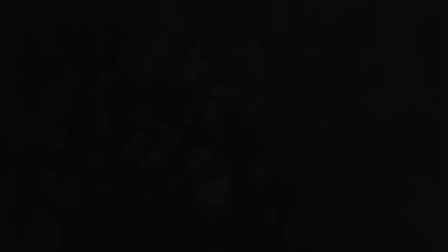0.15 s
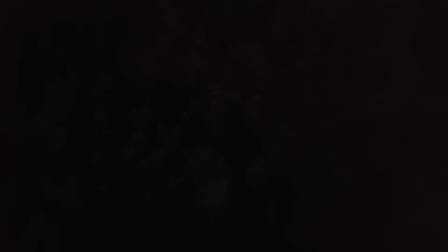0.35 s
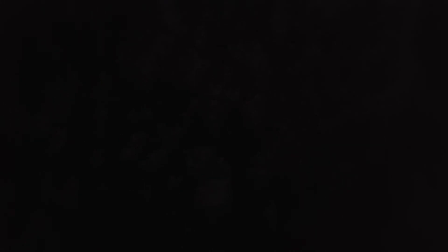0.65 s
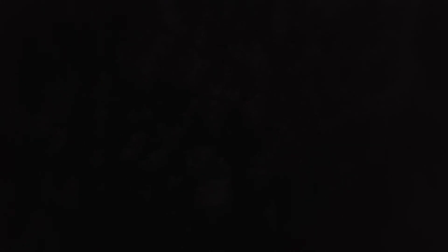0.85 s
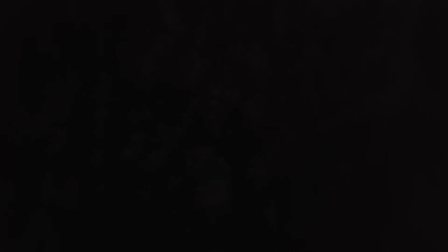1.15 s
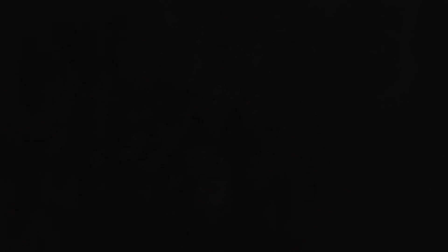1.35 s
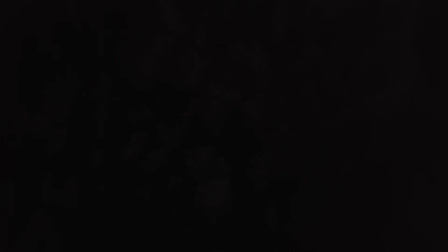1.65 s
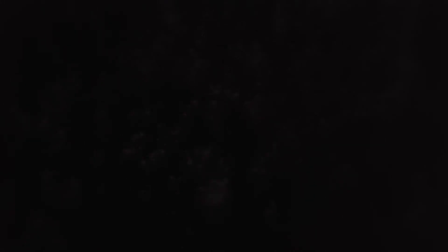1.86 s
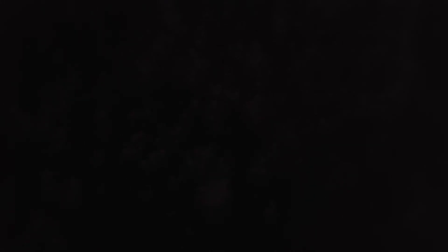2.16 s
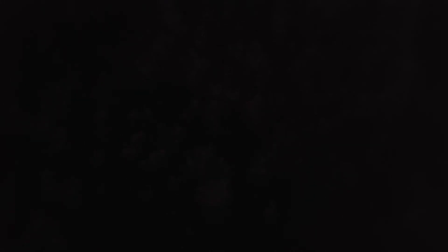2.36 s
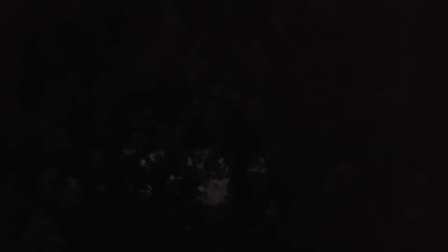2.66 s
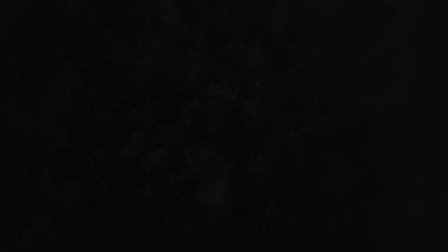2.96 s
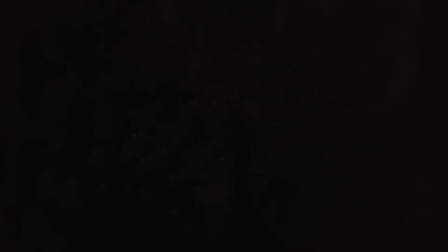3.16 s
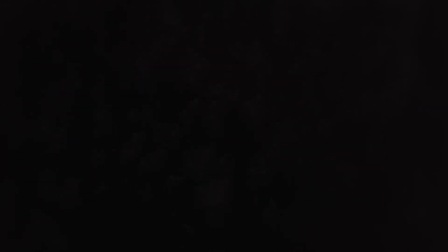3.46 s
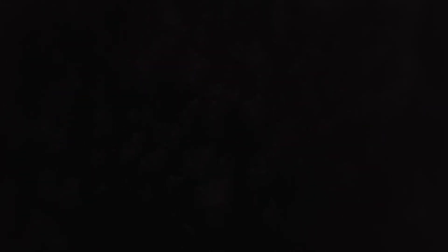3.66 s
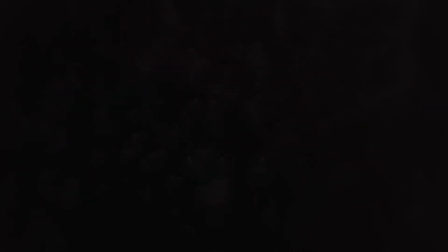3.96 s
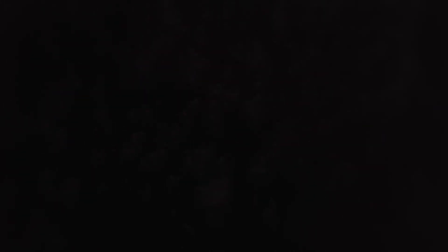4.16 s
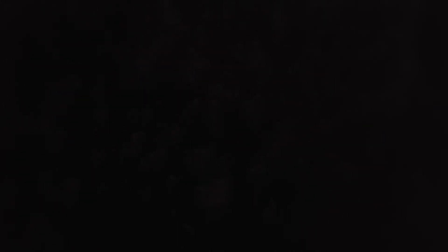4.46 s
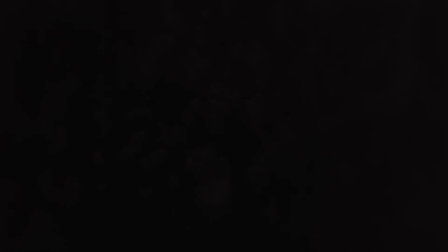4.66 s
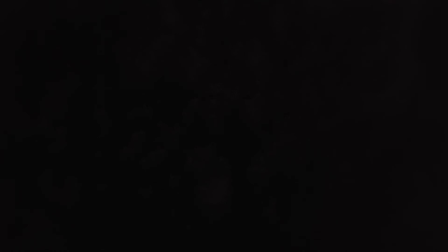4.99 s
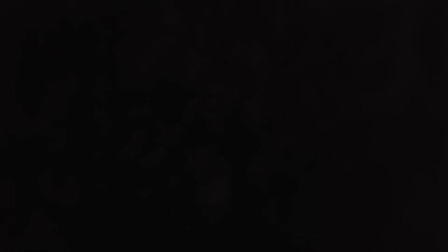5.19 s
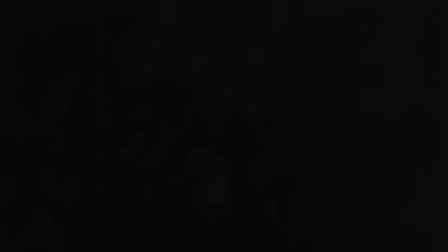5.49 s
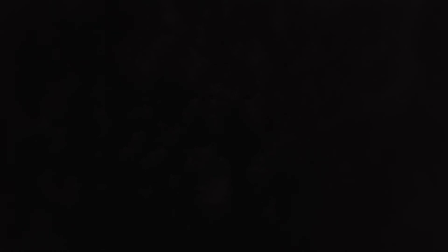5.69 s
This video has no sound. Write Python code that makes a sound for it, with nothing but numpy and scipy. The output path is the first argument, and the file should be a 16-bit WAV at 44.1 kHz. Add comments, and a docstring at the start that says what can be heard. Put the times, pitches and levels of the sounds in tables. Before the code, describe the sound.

Rain falls on a parked car, heard in stereo from inside the small, padded cabin. Throughout, a soft low rumble wavers gently under faint microphone hiss. From 0 to 0.8 seconds, quick irregular taps and dull thuds land on roof and glass, with fine droplets ticking between. Around 0.9 to 1.5 seconds the heaviest cluster arrives: several loud, hollow knocks at about 1.0, 1.08, 1.25 and 1.5. It then eases; from 1.6 to 2.3 drops are more spaced, with a firm hit at 2.5. From 2.7 to 4.8 many softer, muffled taps continue, and the fine patter thins, with bassy roof booms near 3.15 and 4.9. The loudest single knock strikes at 5.3, followed by another solid drop at 5.7 and light taps to the end at about 5.8. Each drop is brief, with a short damped ring of the metal panel and no rhythm.

```python
"""Rain on a parked car, heard from the cabin.

Heavy drops thud on roof and glass over a low rumble (shaped noise) and microphone hiss; finer drops patter between.
Each drop rings the dense panel modes, dying cosine and sine waves, at strengths drawn anew for its spot.
Each heavy drop also throws a droplet that falls back; now and then the roof booms, mostly in its bass modes.
"""
import sys
import numpy as np
from scipy.fft import rfft, irfft, next_fast_len
from scipy.io import wavfile
from scipy.ndimage import map_coordinates

SR = 44100
rng = np.random.default_rng(int(sys.argv[2]) if len(sys.argv) > 2 else 0)


def file_out(sig):
    """Save sig as 16-bit WAV at sys.argv[1]."""
    # one column per channel
    cols = np.atleast_2d(sig).T
    # limit, then scale
    lim = np.clip(cols, -1, 1)
    pcm = np.round(lim * 32767).astype(np.int16)
    wavfile.write(sys.argv[1], SR, pcm)


N = 257103

# Heavy drops. Each row: start in seconds, level in dB, brightness in dB and splat hiss in dB
# (both against the level), remoteness along the panel from 0 to 1.
HEAVY_DROPS = [(0.064,-31,-8,-32,0.057),(0.128,-34.5,-13,-42,0.063),(0.196,-45.5,-8,-36,0.23),(0.237,-32.5,-26,-28,0.35),
               (0.254,-51.5,3,-18,0.4),(0.332,-35.5,-16.5,-25,0.67),(0.367,-32.5,-5.5,-14,0.11),(0.381,-29,-16,-21,0.52),(0.41,-38.5,-14,-20,0.35),
               (0.465,-55,-3,-16,0.29),(0.482,-34.5,-6.5,-19,0.31),(0.514,-37.5,-6.5,-14,0.22),(0.566,-46.5,-9.5,-15,0.44),(0.658,-49.5,-17,2,0.27),
               (0.721,-46.5,-17,-14,0.57),(0.743,-37.5,-37,-21,0.69),(0.894,-25.5,-15,-36,0.23),(0.979,-38.5,-6,-21,0.53),(1.001,-19,-9.5,-19,0.4),
               (1.059,-34,-11,-24,0.56),(1.074,-20,-16,-30,0.53),(1.093,-20.5,-14,-24.5,0.48),(1.175,-32.5,-46,-42,0.086),
               (1.243,-20.5,-19.5,-26,0.35),(1.283,-30,-21.5,-26,0.63),(1.339,-35.5,-13,-40,0.53),(1.36,-43,-3,-36,0.65),
               (1.414,-38,-12,-18,0.56),(1.438,-28,-8,-22,0.057),(1.478,-29.5,-39,-29,0.41),(1.493,-18.5,-14,-18.5,0.52),
               (1.559,-49.5,-2,-3,0.057),(1.747,-34.5,-6.5,-27,0.42),(1.823,-33,-20,-33,0.39),(1.932,-29,-16,-23.5,0.63),
               (2.087,-47,-8,-8,0.78),(2.122,-33.5,-18.5,-23.5,0.53),(2.222,-35,-33,-30,0.49),(2.323,-35.5,-25,-28,0.68),(2.354,-26.5,-2,-20,0.26),
               (2.391,-27.5,-11.5,-34,0.35),(2.456,-32,-20,-26,0.52),(2.521,-21.5,-20,-28.5,0.5),(2.712,-43,-28,-39,0.49),
               (2.754,-33,-28,-21,0.49),(2.766,-37,-6.5,-11,.45),(2.81,-42.5,-9,-11,0.6),(2.829,-30.5,-15,-24,0.51),
               (2.843,-37.5,-5,-23,.39),(2.874,-36,-2,-16,0.61),(2.919,-35,-15,-46,0.38),(3.117,-30,-22,-34,0.87),
               (3.138,-31,-28,-18.5,0.56),(3.184,-31.5,-20,-27,0.54),(3.227,-48,-9,-19,0.61),(3.26,-38.5,-19,-22,0.63),(3.354,-28,-21.5,-31,0.46),
               (3.401,-34,-18,-27,.46),(3.471,-52,-3,-10,0.097),(3.496,-38.5,-21,-19,0.83),(3.529,-32,-17,-28,0.18),
               (3.599,-50.5,-6,-13,0.23),(3.709,-37,-30,-28,0.86),(3.755,-29.5,-19.5,-36,0.53),(3.901,-37.5,-17.5,-24,0.68),(4.045,-35,-14,-28,0.69),
               (4.136,-36,-27,-30,.27),(4.253,-29.5,-12,-49,0.18),(4.289,-33,-21,-25,0.62),(4.337,-30.5,-25,-31,0.64),
               (4.364,-45,-6,-11,0.66),(4.385,-30.5,-16,-20,0.73),(4.414,-30,-12,-16,0.73),(4.457,-31,-20.5,-24,0.53),
               (4.542,-34,-26,-28,0.71),(4.672,-49,-37,-32,0.47),(4.718,-40.5,-14,-20,0.9),(4.742,-32.5,-19,-27,0.65),(4.766,-32,-22,-24.5,0.52),(4.847,-31,-22,-29,0.53),
               (4.863,-41,-17,-18,0.56),(4.882,-27.5,-17.5,-21.5,.46),(4.937,-31.5,-17,-25,0.73),(4.963,-39.5,-15,-31,0.67),(5.059,-32.5,-19.5,-24,0.45),
               (5.186,-35.5,-22,-26,0.31),(5.286,-16,-14,-19,0.42),(5.407,-33.5,-34,-25,0.67),(5.46,-29,-22,-26,0.48),
               (5.594,-45,-11,-45,.68),(5.706,-24,-14,-26.5,0.59),(5.749,-29,-22,-25,0.69),(5.823,-34,-10,-14,0.74)]


def amp(db):
    """Decibels to gain."""
    return 10 ** (np.asarray(db) / 20)


def along(points, hz):
    """Interpolate (Hz, value) points on a log frequency axis, held flat beyond the ends."""
    point_hz, values = np.transpose(points)
    return np.interp(np.log(hz + 1), np.log(point_hz + 1), values)


def filtered(x, response):
    """Filter x by a response given as a function of frequency."""
    size = next_fast_len(N + SR // 2)
    hz = np.fft.rfftfreq(size, 1 / SR)
    return irfft(rfft(x, size) * response(hz), size)[..., :N]


def ears(a, b, hz):
    """Mix two unrelated draws into left and right, as alike as the microphones are at hz."""
    # Each row: frequency in Hz, left-right correlation.
    likeness = [(60, 0.99), (180, 0.96), (550, 0.6), (1650, -0.19), (4970, 0.084), (15000, -0.26)]
    # Each row: frequency in Hz, left minus right in dB.
    lean_db = [(60, -0.5), (180, 1), (550, -1.5), (1650, -3.5), (4970, 1.5), (15000, 1)]
    angle = np.arccos(np.clip(along(likeness, hz), -1, 1)) / 2
    lean = amp(along(lean_db, hz) / 2)
    common, opposed = np.cos(angle) * a, np.sin(angle) * b
    return np.array([(common + opposed) * lean, (common - opposed) / lean])


def noise(spectrum):
    """Stereo Gaussian noise shaped by a spectrum in dB per Hz, scaled to rms 1."""
    size = next_fast_len(N)
    hz = np.fft.rfftfreq(size, 1 / SR)
    a, b = rfft(rng.standard_normal((2, size)))
    x = irfft(ears(a, b, hz) * amp(along(spectrum, hz)), size)[:, :N]
    return x / np.sqrt(np.mean(x ** 2))


def rumble():
    """Distant rain booms softly through the body: low noise whose level drifts and wavers slightly."""
    # Each row: frequency in Hz, relative density in dB per Hz.
    rumble_spectrum = [(12, -54), (20, -8), (80, 4.5), (195, 2), (335, -17), (545, -12.5), (702, -21.5),
                       (1500, -32), (1950, -61), (3300, -120)]
    # Each row: time in seconds, rms level in dB.
    rumble_level = [(0.0, -47), (0.58, -53), (1.51, -47.5), (1.98, -56.5), (3.46, -49), (3.8, -55),
                    (4.86, -49), (5.31, -50.5), (5.83, -47)]
    lump_hz, lump_db = 14, 0.2
    t = np.arange(N) / SR
    s, db = np.transpose(rumble_level)
    lumps = map_coordinates(rng.standard_normal(N * lump_hz // SR + 4), [t * lump_hz])
    return amp(np.interp(t, s, db) + lump_db * lumps) * noise(rumble_spectrum)


def small(s, db):
    """Strike rows for small drops, each with a random colour and distance."""
    z = rng.standard_normal((len(s), 5))
    colour_db = [-6, -4, -10, -26] + [4, 5, 6, 5] * z[:, :4]  # bass, middle, bright, top
    remote = .78 + .2 * z[:, 4]
    return np.c_[s, db, colour_db, remote]


def patter(count, over_db, scatter_db):
    """Fine drops at random moments, their levels scattered about the swelling and thinning shower."""
    # Each row: time in seconds, base level of the fine rain in dB, before over_db.
    shower_level = [(0, -58.5), (1.0, -65.5), (1.2, -55), (1.9, -67.5), (3.8, -73.5), (5.0, -63),
                    (5.83, -70.5)]
    u = rng.random((count, 2))
    s = u[:, 0] * N / SR
    shower_db = np.interp(s, *np.transpose(shower_level))
    return small(s, shower_db + over_db + scatter_db * np.log(u[:, 1] + 0.33))


def splashes(count, under_db):
    """Each heavy drop throws count droplets that fall back soon after, fainter the later they land."""
    s, db = np.repeat(np.array(HEAVY_DROPS)[:, :2], count, axis=0).T
    u = rng.random((len(s), 2))
    late_s = 0.018 + 0.12 * u[:, 0]
    return small(s + late_s, db - under_db - 120 * late_s - 8 * u[:, 1])


def thuds():
    """Strike rows for roof booms: the bass modes ring, the others barely."""
    # Each row: start in seconds, level of the bass modes in dB.
    booms = [(0.232, -34), (0.368, -32.5), (0.658, -32.5), (0.74, -34.5), (0.892, -31.5), (1.435, -32.5),
             (1.611, -38), (2.353, -28.5), (3.014, -42), (3.16, -30), (4.289, -34.5), (4.544, -33),
             (4.763, -41), (4.88, -27), (5.418, -38), (5.59, -39.5)]
    return [(s, db - 20, 20, 0, -10, -20, .5) for s, db in booms]


def heavy():
    """Strike rows for heavy drops: brightness lifts the middle; the strongest crack more than they boom."""
    # Standard deviation from spot to spot: bass in dB, middle in dB.
    spot_scatter = [2, 6]
    bass_base_db, bass_lags = -10.5, 0.51  # bass of a -30 dB drop; share of extra strength it misses
    middle_base_db, middle_follows = -3.5, 0.33  # share of the brightness added to the middle
    s, db, bright_db, top_db, remote = np.transpose(HEAVY_DROPS)
    bass_mean_db = bass_base_db - bass_lags * (db + 30)
    middle_mean_db = middle_base_db + middle_follows * bright_db
    scatter_db = spot_scatter * rng.standard_normal((len(s), 2))
    bass_db, middle_db = (np.c_[bass_mean_db, middle_mean_db] + scatter_db).T
    return np.c_[s, db, bass_db, middle_db, bright_db, top_db, remote]


def registers(hz):
    """Split the panel and cabin response into bass, body, middle, bright and top modes, each of energy 1."""
    # Each row: frequency in Hz, relative density in dB per Hz.
    panel_spectrum = [(35, -41), (60, -8), (294, -8), (553, -8), (698, -15), (1310, -5.5), (1740, -4),
                      (2250, -6.5), (2470, -7), (3340, -3), (16000, -34.5)]
    # Cabin resonances. Each row: centre in Hz, width in Hz, lift in dB.
    cabin_peaks = [(210, 163, 10.5), (553.5, 22, 8), (813, 255, 6.5), (1050, 200, 0), (1256, 53, 4.5),
                   (1552, 13, 9)]
    lift_db = sum(peak_db / (1 + (2 * (hz - centre) / width) ** 2) for centre, width, peak_db in cabin_peaks)
    # root of the mode spacing turns density into strength per mode
    strength = amp(along(panel_spectrum, hz) + lift_db) * np.sqrt(np.gradient(hz))
    below = [1 / (1 + (hz / edge_hz) ** 5) for edge_hz in (370, 1050, 2300, 6500)]
    sets = strength * np.diff([0 * hz, *below, 1 + 0 * hz], axis=0)
    return sets / np.linalg.norm(sets, axis=1, keepdims=True)


def panel_modes(count):
    """Mode frequencies, closer together in the bass, and their dying waves in two phases."""
    # Each row: frequency in Hz, mean t60 of the panel in seconds.
    ring_t60 = [(150, 0.37), (400, 0.25), (1040, .16), (2760, 0.13), (7280, 0.12), (15000, 0.12)]
    # Slow bending waves bring the bass late. Each row: frequency in Hz, rise time constant in seconds.
    rise_time = [(150, 0.00067), (600, 0.00039), (3000, 0.00011), (12000, 0.00024)]
    splat_t60_s, splat_from_hz = 0.025, 1800
    hz = 60 + 15900 * ((np.arange(count) + rng.random(count)) / count) ** 1.4
    t = np.arange(SR // 5) / SR
    t60_s = along(ring_t60, hz) * amp(0.5 * rng.standard_normal(count))
    ring = amp(-60 * t / t60_s[:, None])
    splat = 0.94 * amp(-60 * t / splat_t60_s) * (hz[:, None] > splat_from_hz)  # dies before the panel
    rise = 1 - np.exp(-t / along(rise_time, hz)[:, None])
    shape = (ring + splat) * rise
    phase = 2 * np.pi * hz[:, None] * t
    return hz, t, np.float32(np.vstack([shape * np.cos(phase), shape * np.sin(phase)]))


def strike(drops, hz, t, waves):
    """Each drop lands on its own spot, so it rings every mode at a new strength."""
    s, db, bass_db, middle_db, bright_db, top_db, remote = np.transpose(drops)
    register_db = np.array([bass_db, 0 * db, middle_db, bright_db, top_db])
    mean = amp(db - 6 + register_db).T @ registers(hz)
    chance = rng.standard_normal((len(drops), 5, len(hz))).transpose(1, 0, 2)
    gain = mean * amp(2.94 * chance[0]) * chance[1:]  # nodes and bellies of each mode
    # restore each drop's energy: 4 gain sets, hence the factor 2
    gain = gain * (np.linalg.norm(mean, axis=1) / np.linalg.norm(gain, axis=(0, 2)) * 2)[:, None]
    a, b = np.hstack(gain[:2]), np.hstack(gain[2:])  # cosine and sine gains
    rings = np.float32(ears(a, b, np.tile(hz, 2))) @ waves
    far = np.clip(remote, 0, 1)[:, None]
    swell = 1 - np.exp(-t / (.00008 * np.exp(6.09 * far)))  # a far drop arrives smeared through the lining
    near = amp(-600 * t * (1 - far) ** 3)  # a near drop is mostly direct sound and dies sooner
    fade = np.clip((t[-1] - t) / .05, 0, 1)
    rings = rings * swell * near * fade
    out = np.zeros((2, N + len(t)))
    starts = np.clip(np.round(s * SR).astype(int), 0, N)
    for k, start in enumerate(starts):
        out[:, start:start + len(t)] += rings[:, k]
    return out[:, :N]


def scene():
    """Rumble under fine patter, splashes, booms and heavy drops."""
    fine = patter(count=420, over_db=10.0, scatter_db=2.1)
    droplets = splashes(count=1, under_db=17.5)
    drops = np.vstack([heavy(), thuds(), fine, droplets])
    return rumble() + strike(drops, *panel_modes(count=560))


def record(dry):
    """Add microphone hiss, then cut everything above the band limit."""
    # Each row: frequency in Hz, relative density in dB per Hz.
    hiss_spectrum = [(590, -1), (1000, -16), (1220, 3.5), (5190, -9.5), (15100, -12), (16000, -4.5)]
    hiss_db, top_hz = -67, 15950
    return filtered(dry + amp(hiss_db) * noise(hiss_spectrum), lambda hz: hz < top_hz)


dry = scene()
out = record(dry)
file_out(out)
```